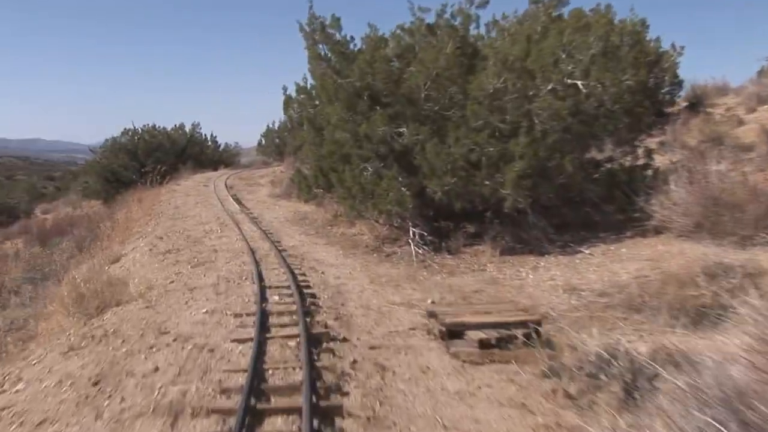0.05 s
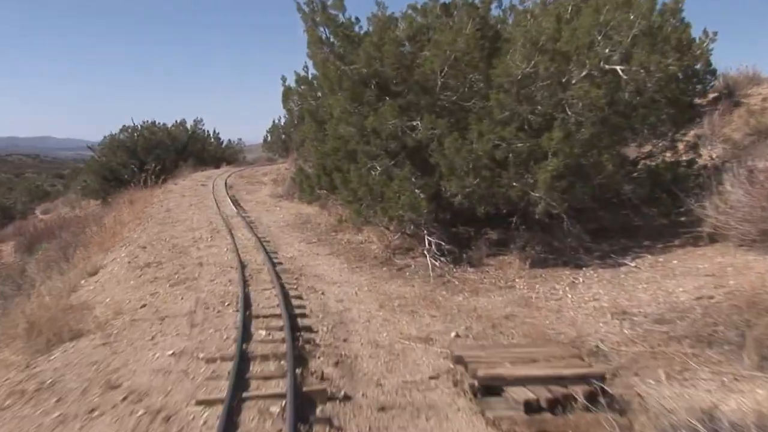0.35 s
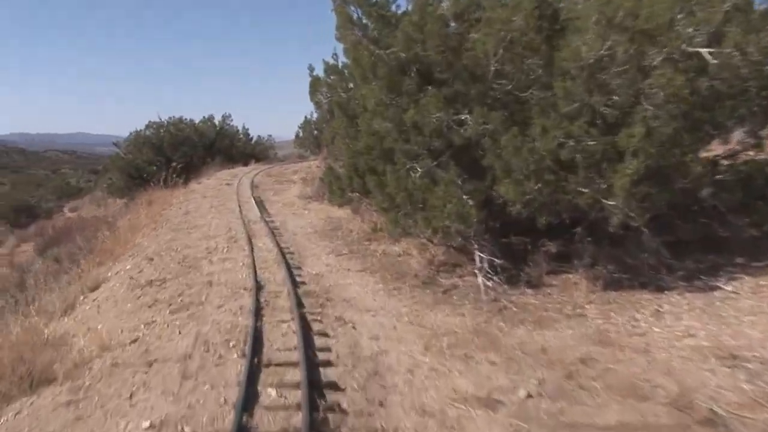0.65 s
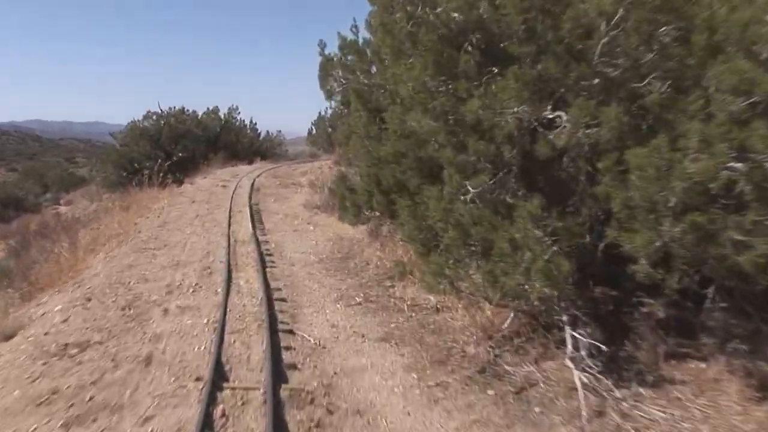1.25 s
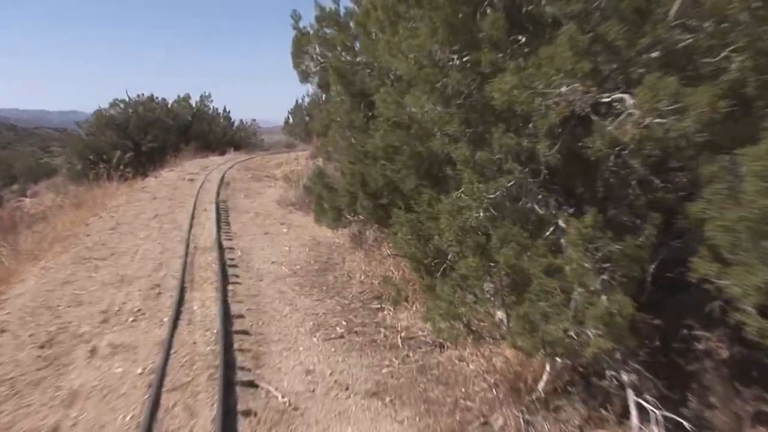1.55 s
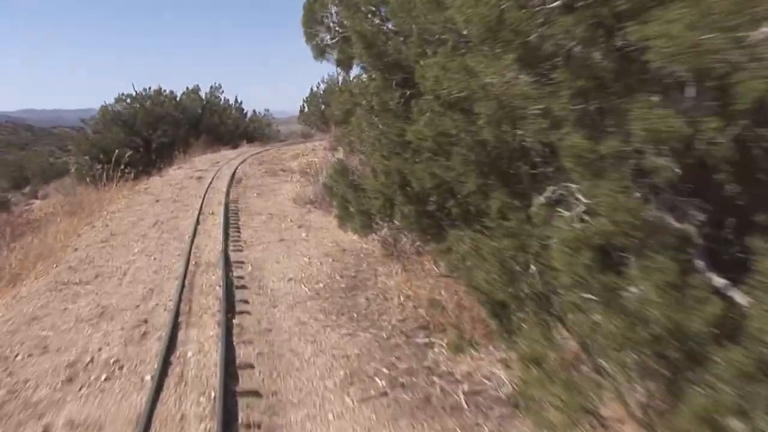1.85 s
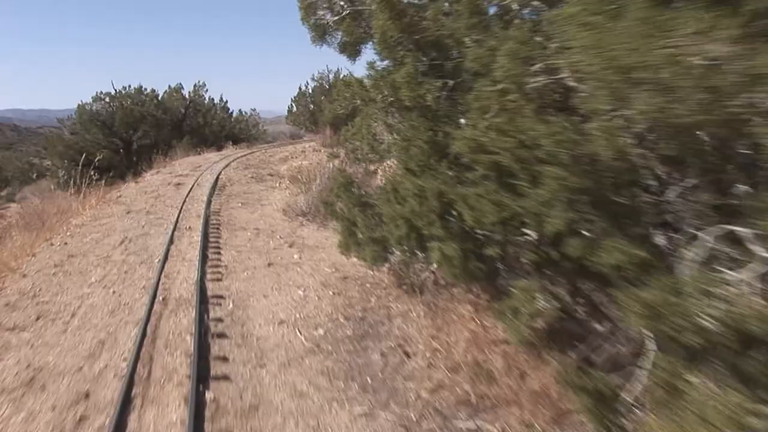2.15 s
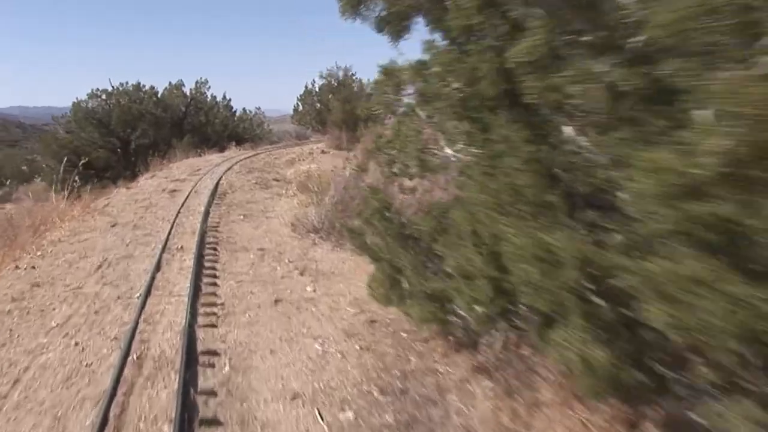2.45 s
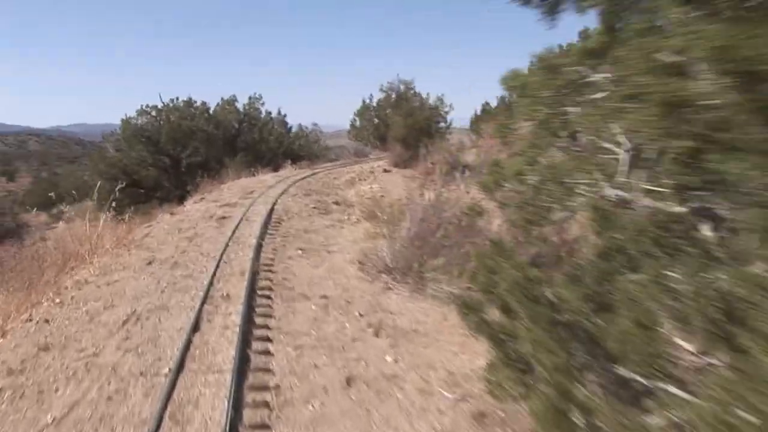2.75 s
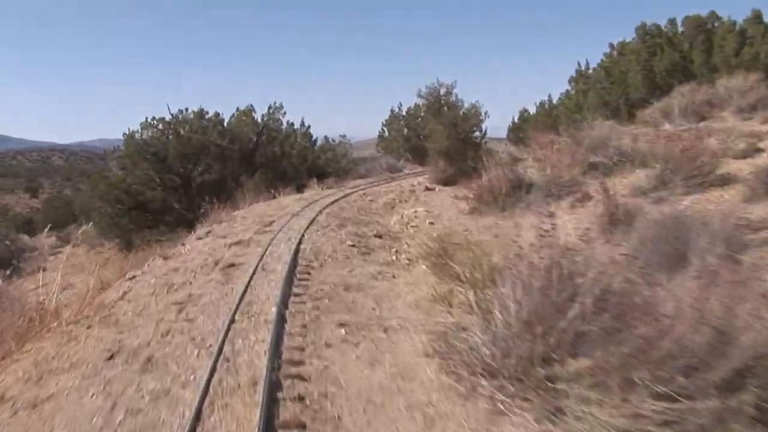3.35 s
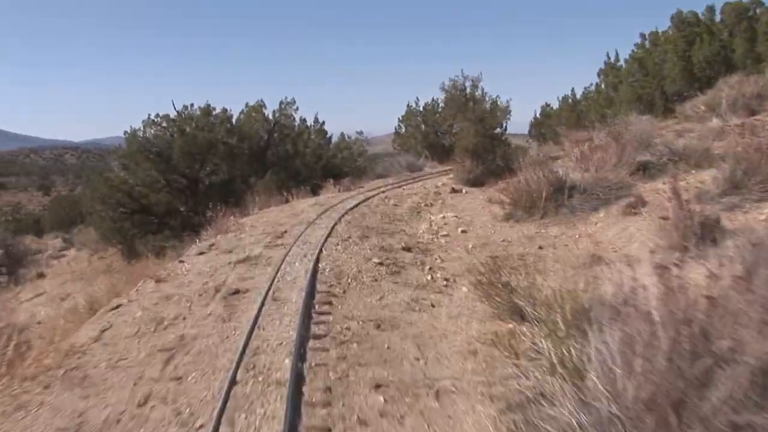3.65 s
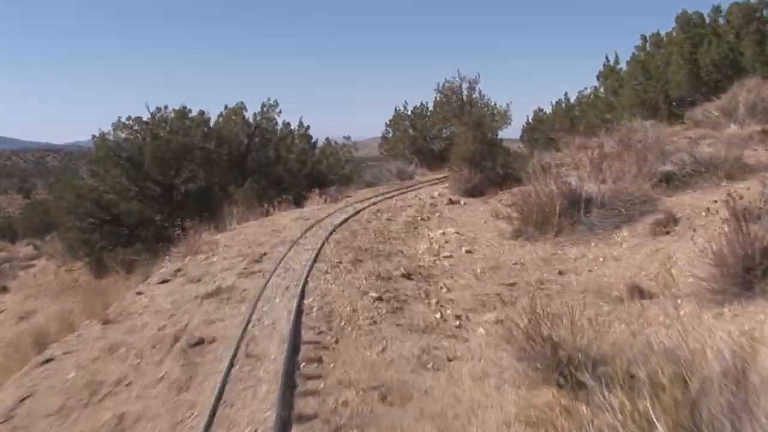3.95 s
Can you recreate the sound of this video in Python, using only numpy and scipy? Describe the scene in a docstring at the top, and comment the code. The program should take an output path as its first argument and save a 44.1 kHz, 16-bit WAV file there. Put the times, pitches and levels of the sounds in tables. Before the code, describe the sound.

Heard from on board outdoors, a miniature train rolls with a steady low rumble and small jolts. Irregular metal clacks come from the rail joints, and midway the wheel rims scrape and squeak briefly before a few more clacks.

```python
"""A miniature train ride

We ride narrow track on an open hillside, and a thin hiss swells as the bushes go by.
The car rumbles, jolts and hums; its steel wheels crunch grit and ring as they roll.
In a bend their rims (flanges) scrape and chirp against the rail. At rail joints they clack."""
import sys
import numpy as np
from scipy import signal
from scipy.fft import rfft, irfft
from scipy.io import wavfile

SR = 44100
rng = np.random.default_rng(int(sys.argv[2]) if len(sys.argv) > 2 else 0)


def master(y):
    """Save y as 16-bit WAV."""
    cut = np.clip(np.atleast_2d(y).T, -1, 1)
    pcm = np.round(cut * 32767)  # scale
    wavfile.write(sys.argv[1], SR, pcm.astype(np.int16))


N = 176400   # 4 seconds
TIME = np.arange(N) / SR
FREQS = np.maximum(np.arange(N // 2 + 1) * SR / N, 1)


def from_db(db):
    """Turn decibels into a number to multiply by."""
    return 10 ** (np.asarray(db) / 20)


def unit_level(x):
    """Scale a sound so its average strength (rms) is 1."""
    return x / np.sqrt(np.mean(x ** 2) + 1e-20)


def over_time(points):
    """Join points in time with straight lines."""
    return np.interp(TIME, *np.transpose(points))


def over_pitch(points):
    """Join points with straight lines on a log frequency scale."""
    hz, db = np.transpose(points)
    return np.interp(np.log(FREQS), np.log(hz), db)


def drift(hz):
    """A random wobble of about size 1, mostly slower than hz."""
    return unit_level(irfft(rfft(rng.standard_normal(N)) / (1 + (FREQS / hz) ** 2), N))


def clicks(times, db):
    """One click for each blow."""
    out = np.zeros(N)
    out[np.clip((times * SR).astype(int), 0, N - 1)] = from_db(db)
    return out


def random_clicks(per_s):
    """Clicks at random moments."""
    return rng.random(N) < per_s / SR


def ring(blows, hz, ring_s):
    """Each blow starts a note that fades by 60 dB in ring_s seconds."""
    fade, turn = from_db(-60 / (ring_s * SR)), 2 * np.pi * hz / SR
    return signal.lfilter([0, np.sin(turn)], [1, -2 * fade * np.cos(turn), fade * fade], blows + 1e-18)


def soften(x, hz):
    """A soft contact dulls the sound above hz."""
    return signal.sosfilt(signal.butter(2, hz, fs=SR, output="sos"), x)


def tones(rows, waver, rough_db, glide=0):
    """Short, wavering notes; glide slides each one up or down."""
    out = np.zeros(N)
    for start, length, hz, db in rows:
        progress = np.clip((TIME - start) / length, 0, 1)
        swell = np.sqrt(np.abs(np.sin(np.pi * progress)))
        bend = waver * drift(121) + glide * rng.choice([-1, 1]) * (progress - .5)
        phase = 2 * np.pi * np.cumsum(hz * (1 + bend)) / SR
        out += from_db(db + rough_db * drift(100)) * swell * np.sqrt(2) * np.sin(phase)
    return out


# how wide the noise sounds: f/Hz, side minus middle/dB
STEREO_WIDTH = [(60, -67), (140, -40), (270, -20.5), (400, -12.5), (560, -3), (800, -6), (1300, -9.5),
                (2000, -14), (3200, -14.5), (4400, -1.5), (6000, 7), (8300, 7.5), (10300, -7), (14000, 0.5)]
# which way it leans: f/Hz, left minus right/dB
STEREO_BALANCE = [(200, 0), (560, -2), (2400, -0.9), (8000, 0.5), (14000, -1.5)]

def noise(colour, peaks=()):
    """Stereo noise of strength 1; its colour says how strong each frequency is next to the others."""
    db = over_pitch(colour) + sum(lift / (1 + (2 * (FREQS - hz) / width) ** 2) for hz, width, lift in peaks)
    middle, side = rfft(rng.standard_normal((2, N)))
    left_right = np.array([[1], [-1]])
    stereo = middle + left_right * side * from_db(over_pitch(STEREO_WIDTH))
    lean_db = left_right * over_pitch(STEREO_BALANCE) / 2
    return unit_level(irfft(stereo * from_db(db + lean_db), N))


# how loud the hiss is: t/s, level/dB
BUSH_LEVEL = [(0, -59.5), (1.3, -64), (2.05, -60.5), (2.45, -55.5), (3.2, -53.5), (4, -56)]
# its colour: f/Hz, level/dB
BUSH_COLOUR = [(5000, -20), (7000, -7), (8500, -4), (9600, 1), (11500, 11), (16000, 7)]

def bushes(flutter_db):
    """A thin, very high hiss swells as the bushes pass."""
    return from_db(over_time(BUSH_LEVEL) + flutter_db * drift(60)) * noise(BUSH_COLOUR)


# colour of grit and of the bright snap in a clack: f/Hz, level/dB
GRIT_COLOUR = [(1500, 1), (4000, 10), (5700, 10.5), (6900, -12.5), (8600, 2), (16000, -4.5)]

def grit(per_s, peak_db, fade_s):
    """Sand on the rail cracks under the wheels."""
    sizes = from_db(peak_db - 1.5 * np.minimum(rng.exponential(1, N), 3))
    cracks = sizes * random_clicks(per_s)
    bursts = signal.lfilter([1], [1, -np.exp(-1 / (fade_s * SR))], cracks + 1e-18)
    return bursts * noise(GRIT_COLOUR)


# hums of the car: t/s, length/s, f/Hz, level/dB
BODY_HUMS = [(.685, 0.029, 180, -22), (1.175, .055, 265, -26.5), (1.92, 0.14, 276, -28),
             (2.96, .21, 198, -29.5)]

def hums():
    """The car's body hums briefly as it rocks."""
    return tones(BODY_HUMS, waver=0.014, rough_db=0.5)


# how loud the rumble is: t/s, level/dB
SHAKE_LEVEL = [(0, -28), (.45, -29), (.7, -27.5), (1.03, -27.5), (1.45, -24), (1.8, -26), (2.2, -25),
               (2.72, -27.5), (2.87, -24.5), (3.12, -24), (3.27, -27.5), (3.42, -24.5), (4, -26)]
# its colour: f/Hz, level/dB
SHAKE_COLOUR = [(20, -46), (27, -21), (37, -3.5), (60, -7), (85, -2), (145, 0), (200, -2.5), (235, -6.5),
                (275, -5.5), (330, -13), (450, -24), (800, -31.5), (2000, -68.5)]
# notes the car's body rings at: f/Hz, level/dB, ring time/s
BODY_NOTES = [(142.3, -2, 0.3), (194.5, 3, 0.1), (273.6, -3.5, 0.22)]

def rumble(flutter_db, knocks_per_s, knock_db):
    """The car shakes on its wheels, and small knocks from below ring its body."""
    knocks = random_clicks(knocks_per_s) * rng.uniform(0.49, 1, N)
    body = sum(from_db(db) * ring(knocks * rng.choice([-1, 1], N), hz, ring_s)
               for hz, db, ring_s in BODY_NOTES)
    level = from_db(over_time(SHAKE_LEVEL) + flutter_db * drift(23))
    return level * (noise(SHAKE_COLOUR) + from_db(knock_db) * unit_level(body))


# bumps from uneven track: t/s, level/dB
TRACK_BUMPS = [(0.298, -8.5), (0.586, -12), (0.644, -7.5), (0.77, -7.5), (1.349, -7), (2.633, -10),
               (2.811, -9.5), (3.352, -7.5), (3.636, -6)]

def jolts():
    """Dips in the track bump the car, a swing or two each."""
    bumps = clicks(*np.transpose(TRACK_BUMPS))
    return soften(ring(bumps, hz=111, ring_s=0.03), hz=248)


# how loud the rolling is: t/s, level/dB
ROLLING_LEVEL = [(0, -32.5), (.7, -32), (1.8, -30), (2.7, -31.5), (3.3, -32), (4, -31)]
# its colour: f/Hz, level/dB
ROLLING_COLOUR = [(200, 7), (420, 3), (850, 0), (1300, 4), (1800, 4), (2350, -3.5), (2900, -6), (3600, -15),
                  (4400, -23.5), (5600, -28.5), (6800, -56), (9000, -41.5), (16000, -35.5)]
# where wheels and frame ring: f/Hz, width/Hz, boost/dB
WHEEL_PEAKS = [(556, 85, 5.5), (1999, 245, 9), (5020, 200, 8.5), (5920, 230, 8.5)]

def rolling(flutter_db, sing_db, pulse_db):
    """Rough rail makes the wheels rush and sing their main note in uneven pulses."""
    pulses = from_db(sing_db + pulse_db * drift(27))
    note = unit_level(ring(rng.standard_normal(N), hz=2021, ring_s=0.073))
    level = from_db(over_time(ROLLING_LEVEL) + flutter_db * drift(32))
    return level * (noise(ROLLING_COLOUR, WHEEL_PEAKS) + pulses * note)


# the scrape grows as the rims press harder on the rail: t/s, level/dB
SCRAPE_LEVEL = [(0, -34.5), (.2, -39.5), (.3, -42.5), (.75, -43.5), (1.1, -40.5), (1.36, -39.5),
                (1.39, -27.5), (1.47, -27), (1.505, -30.5), (1.535, -30), (1.595, -32), (1.72, -29),
                (1.81, -33), (1.87, -24.5), (1.97, -34), (2.08, -39.5), (2.33, -39), (2.4, -35),
                (2.65, -45), (4, -50)]
# colour of the rubbing: f/Hz, level/dB
RUB_COLOUR = [(300, -18), (900, -21), (1500, -1), (2300, 0.5), (3250, 0.5), (3800, -7), (4500, -23),
              (5600, -31), (6800, -44), (9000, -37.5), (16000, -41)]
# notes a slipping rim rings: f/Hz, level/dB, ring time/s
RIM_NOTES = [(1160, -11, 0.055), (1574, -7.5, 0.07), (1728, -3, 0.029), (2180, -11, 0.042),
             (2616, -4, 0.026), (2850, -4, 0.038), (3070, -3, 0.08), (3314, -9, 0.043)]

def scrape(slips_per_s, ring_db, rub_db, rough_db, wander_db):
    """The rims rub on the rail; many tiny slips ring the wheel, now one note, now another."""
    notes = 0
    for hz, db, ring_s in RIM_NOTES:
        slips = random_clicks(slips_per_s) * rng.choice([-1, 1], N)
        slips = slips * from_db(3 * rng.standard_normal(N))
        note_level = from_db(db + wander_db * np.tanh(drift(37)))
        notes = notes + note_level * unit_level(ring(slips, hz, ring_s))
    ringing = from_db(ring_db) * unit_level(soften(notes, hz=4030))
    rubbing = from_db(rub_db) * noise(RUB_COLOUR)
    return from_db(over_time(SCRAPE_LEVEL) + rough_db * drift(57)) * (rubbing + ringing)


# chirps of the rims: t/s, length/s, f/Hz, level/dB
RIM_SQUEALS = [(0.05, 0.081, 3100, -39), (0.189, 0.055, 3180, -40), (1.515, 0.028, 2635, -30.5),
               (1.522, 0.058, 3113, -32.5), (1.617, 0.033, 1495, -28), (1.625, 0.021, 3120, -32),
               (1.674, 0.044, 1582, -26), (1.698, 0.04, 3120, -27.5), (1.722, 0.026, 3250, -27),
               (1.772, 0.043, 2570, -33.5), (1.865, .045, 1597, -28.5), (1.9, 0.17, 3060, -39.5),
               (2.38, 0.064, 3120, -37), (2.385, 0.051, 1610, -35.5), (3.182, 0.023, 3050, -38),
               (3.692, 0.05, 2672, -35), (3.79, 0.11, 2640, -36), (3.9, 0.042, 2670, -34.5)]

def squeals():
    """A sticking rim locks onto one note for a moment."""
    return tones(RIM_SQUEALS, waver=0.0112, rough_db=2.5, glide=0.01)


# wheels hit rail joints: t/s, clack/dB, thud/dB, snap/dB
JOINT_HITS = [(.191, -28.5, -25.5, -50), (0.434, -26, -30, -40.5), (.514, -21.5, -22, -36),
              (0.823, -19.5, -22, -40.5), (.903, -21.5, -16.5, -40.5), (1.051, -33, -40, -46),
              (1.166, -23.5, -31, -45.5), (1.326, -29, -38, -51), (1.377, -22.5, -28, -41),
              (1.765, -24, -22, -38), (1.851, -20.5, -19.5, -41), (2.112, -26.5, -28, -47),
              (2.27, -28, -29, -43), (2.452, -35.5, -41, -45), (3.417, -28.5, -15, -40),
              (3.497, -30.5, -27, -39.5), (3.584, -41, -33, -46), (3.813, -31, -24, -42)]
# colour of a clack: f/Hz, level/dB
CLACK_COLOUR = [(200, 8.5), (550, 8.5), (900, 3.5), (2200, 3.5), (2700, 4.5), (3500, 0.5), (4000, -4),
                (4500, -12), (5700, -17), (6800, -58), (16000, -53)]
# notes a struck wheel rings: f/Hz, level/dB, ring time/s
STEEL_NOTES = [(1150, -14.5, 0.053), (1670, -21, 0.05), (2130, -11, 0.05), (3170, -17, 0.06),
               (3460, -6.5, 0.025), (3960, -13, 0.045)]

def joints(vary_db, detune, bounces=3, gap_s=0.0055, loss_db_per_s=550, rise_s=0.0005, fade_s=0.0052):
    """At each joint loose metal rattles: it cracks and snaps, the steel rings and the body thuds."""
    times, clack_db, thud_db, snap_db = np.transpose(JOINT_HITS)
    gaps = gap_s * rng.uniform(.5, 2, (len(times), bounces))
    delays = np.cumsum(gaps, axis=1) - gaps[:, :1]
    touches = times[:, None] + delays
    touch_db = -loss_db_per_s * delays + vary_db * rng.standard_normal(delays.shape) * (delays > 0)
    burst = (1 - np.exp(-TIME / rise_s)) * np.exp(-TIME / fade_s)
    crack = steel = 0
    for db, colour in ((clack_db, CLACK_COLOUR), (snap_db, GRIT_COLOUR)):
        blows = clicks(touches, db[:, None] + touch_db)
        crack = crack + signal.fftconvolve(blows, burst)[:N] * noise(colour)
    for when, strength_db in zip(touches, clack_db[:, None] + touch_db):
        blows = clicks(when, strength_db)
        tuning = 1 + detune * rng.standard_normal()   # no two wheels ring alike
        for k, (hz, db, ring_s) in enumerate(STEEL_NOTES):
            steel = steel + from_db(db) * ring(blows, hz * tuning, ring_s) * (-1) ** k
    thud = sum(ring(clicks(times, thud_db + db), hz, ring_s) * (-1) ** k
               for k, (hz, db, ring_s) in enumerate(BODY_NOTES))
    return crack + soften(steel, hz=4460) + thud


def scene():
    """Everything is heard from the car, in open air."""
    background = bushes(flutter_db=2) + grit(per_s=81, peak_db=-58, fade_s=0.0043)
    car = hums() + rumble(flutter_db=1.4, knocks_per_s=35, knock_db=-8) + jolts()
    wheels = rolling(flutter_db=1.98, sing_db=-16, pulse_db=3)
    rims = scrape(slips_per_s=180, ring_db=-2, rub_db=-3.5, rough_db=2, wander_db=4.5) + squeals()
    return background + car + wheels + rims + joints(vary_db=3, detune=0.026)


def record(dry):
    """Turn down the deepest bass and cut off the highest treble."""
    trimmed = signal.sosfilt(signal.butter(4, 31, "high", fs=SR, output="sos"), dry)
    return signal.sosfilt(signal.ellip(12, .1, 80, 15750, fs=SR, output="sos"), trimmed)


dry = scene()
out = record(dry)
master(out)
```